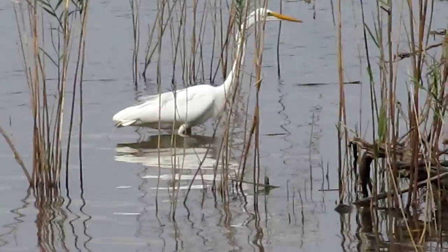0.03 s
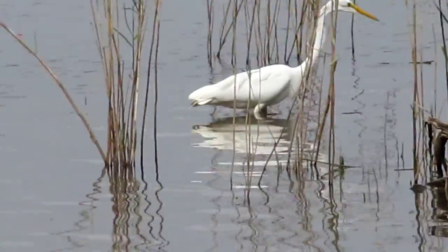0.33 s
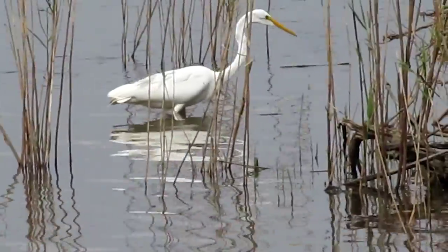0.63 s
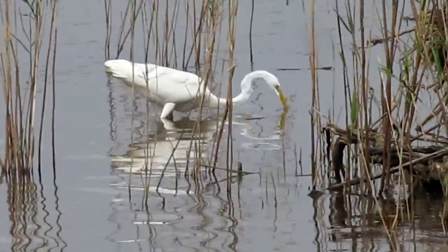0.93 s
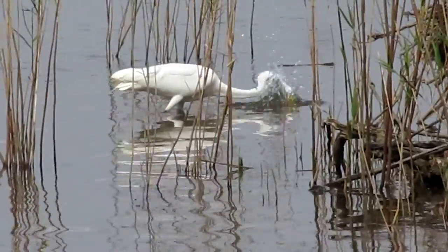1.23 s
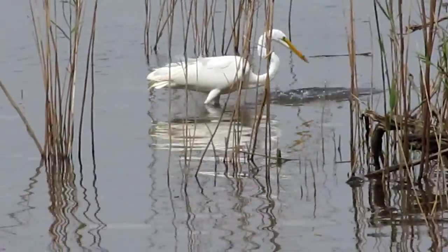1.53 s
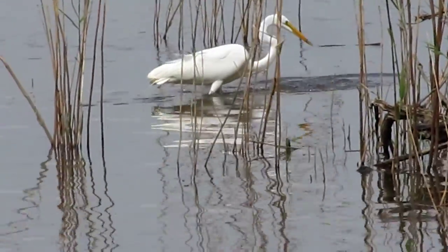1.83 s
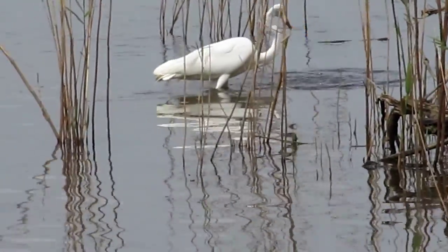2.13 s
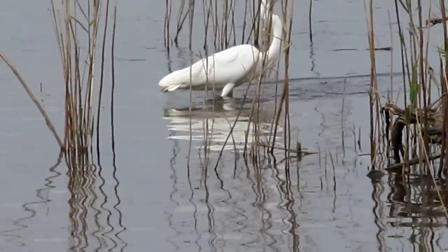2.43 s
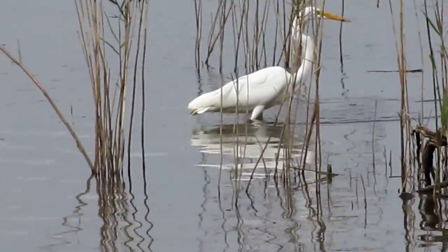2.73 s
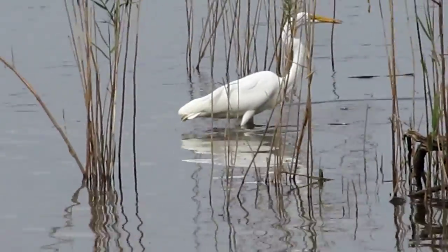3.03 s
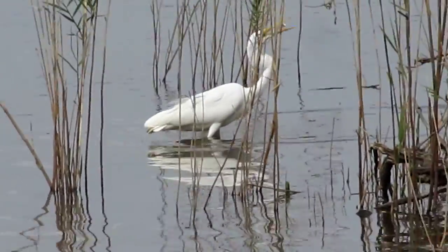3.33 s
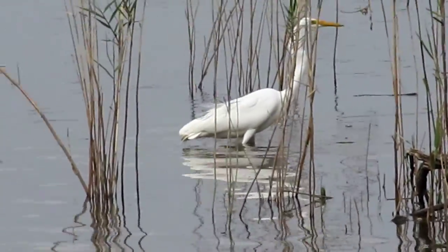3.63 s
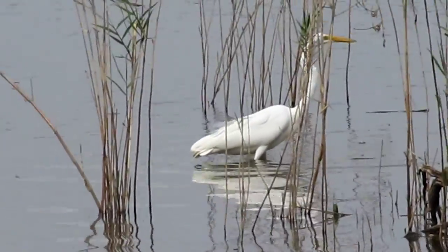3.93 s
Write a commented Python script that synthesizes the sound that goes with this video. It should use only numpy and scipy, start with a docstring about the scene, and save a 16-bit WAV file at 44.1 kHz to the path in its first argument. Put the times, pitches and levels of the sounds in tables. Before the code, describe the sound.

A distant engine drones over far traffic and softly hissing reeds at a lakeside. A wading bird makes a few very faint splashes and drips, then wind buffets the microphone's right side and faint hoots follow.

```python
"""A reedy lakeside, on a stereo microphone in light wind. From the start a distant engine drones, its low
partials swelling and fading, over a steadier engine, far traffic and the hiss of reeds. Between 0.5 and
2 s a wading bird strikes the shallows straight ahead: very faint splashes, drips and bubbles. The drone
sinks slightly, and from 2 s a gust buffets the right port. Near 3 s faint hoots begin, and the traffic
brightens for a moment."""
import sys
import numpy as np
from scipy import signal
from scipy.fft import rfft, irfft, next_fast_len
from scipy.io import wavfile
from scipy.ndimage import uniform_filter1d, map_coordinates

SR = 44100
rng = np.random.default_rng(int(sys.argv[2]) if len(sys.argv) > 2 else 0)


def pcm_store(signal):
    """Save signal as 16-bit PCM."""
    levels = np.round(np.clip(np.atleast_2d(signal), -1, 1) * 32767)
    wavfile.write(sys.argv[1], SR, levels.astype(np.int16).T)


N = 176400


def amp(db):
    """Decibels to gain."""
    return 10 ** (np.asarray(db) / 20)


def unit(x):
    """Scale to rms 1."""
    return x / np.sqrt(np.mean(x ** 2) + 1e-20)


def along(points, hz):
    """Read (frequency [Hz], value) points on a log axis."""
    freqs, values = np.transpose(points)
    return np.interp(np.log(hz + 1), np.log(freqs + 1), values)


def curve(rows):
    """Join (time [s], value) points, one value per sample."""
    return np.interp(np.arange(N) / SR, *np.transpose(rows))


def wobble(rate):
    """A smooth random curve, rate knots a second."""
    return map_coordinates(rng.standard_normal(512), [np.arange(N) * rate / SR], mode="wrap")


def swell(middle_s, width_s):
    """A bell-shaped rise and fall."""
    return np.exp(-((np.arange(N) / SR - middle_s) / width_s) ** 2)


def burst(x, shape):
    """A piece of x under an envelope, of rms 1 at its top."""
    return x * shape / np.sqrt(np.sum((x * shape) ** 2) / np.sum(shape ** 2))


def filtered(x, response):
    """Filter x by a gain given as a function of frequency."""
    size = next_fast_len(N + SR // 2)
    return irfft(rfft(x, size) * response(np.fft.rfftfreq(size, 1 / SR)), size)[..., :N]


def rush(spectrum, coherence, patchy_db):
    """Stereo noise of rms 1, its gain varying in random patches of time and frequency."""
    cells = signal.stft(rng.standard_normal((2, N)), nperseg=1024)[2]
    patches = uniform_filter1d(rng.standard_normal(cells.shape[1:]), size=8, axis=0)
    patches = uniform_filter1d(patches, size=10, axis=1)
    pair = signal.istft(cells * amp(patchy_db * unit(patches)), nperseg=1024)[1][:, :N]

    def mid_side_gains(hz):
        spread = np.arccos(np.clip(along(coherence, hz), -1, 1)) / 2
        return amp(along(spectrum, hz)) * [np.cos(spread), np.sin(spread)]

    mid, side = filtered(pair, mid_side_gains)
    return unit(np.array([mid + side, mid - side]))


def partial(hz, fade_db, drift_rad, rate):
    """A tone of rms 1 whose level and phase waver on the way through the air."""
    phase = 2 * np.pi * (np.cumsum(hz * np.ones(N)) / SR + rng.random())
    return unit(amp(fade_db * wobble(rate)) * np.sin(phase + drift_rad * wobble(rate)))


def spray(centre_hz, octaves, grainy_db):
    """Half a second of grainy noise around one pitch, of rms 1."""
    n = SR // 2
    noise = rng.standard_normal(n)
    grains = amp(grainy_db * rng.standard_normal(n // 32 + 1).repeat(32)[:n])
    offset = np.log2((np.fft.rfftfreq(n, 1 / SR) + 1) / centre_hz) / octaves
    return unit(irfft(rfft(noise * grains) * np.exp(-offset ** 2 / 2), n))


def traffic():
    """Far traffic: an even wash that brightens for a moment."""
    # loudness of the wash (time [s], level [dB])
    level = [(0, -40), (.8, -40), (1.6, -40), (2.4, -40), (3, -40.5), (3.45, -39.5), (4, -40.5)]
    # spectra of the wash and of its brightening (frequency [Hz], relative density [dB])
    spectrum = [(20, -22), (45, -5.5), (90, 2), (150, -2.5), (260, -2.5), (400, -6), (800, -7.5),
                (1100, -10.5), (1600, -15.5), (2300, -23.5), (3500, -35), (9000, -62)]
    bright_spectrum = [(400, -19), (700, 0), (950, 10), (1300, -19), (2200, -32)]
    # likeness of left and right (frequency [Hz], coherence [0-1])
    coherence = [(60, 1), (250, 0.97), (450, 0.89), (740, 0.84), (1200, 0.48), (2000, 0.59), (3000, 0.086)]
    wash = amp(curve(level)) * rush(spectrum, coherence, patchy_db=0.5)
    bright_gain = amp(-48.5) * swell(middle_s=3.33, width_s=0.27)
    return wash + bright_gain * rush(bright_spectrum, coherence, patchy_db=1.0)


def reeds():
    """The thin, high hiss of air and reeds, spread wide along the shore."""
    # loudness of the hiss (time [s], level [dB])
    level = [(0, -56.5), (1.1, -56.5), (2, -56.5), (2.7, -56), (3.3, -58), (4, -56.5)]
    # its spectrum (frequency [Hz], relative density [dB])
    spectrum = [(800, -25), (1800, 0.5), (2600, 4.5), (3600, 3), (5200, 1.2), (7500, -2), (10000, -6),
                (13000, -11), (15000, -13.5), (15700, -25)]
    # likeness of left and right (frequency [Hz], coherence [0-1])
    coherence = [(2000, 0.15), (5000, 0.22), (8000, 0.27), (12000, 0.14)]
    level_db = curve(level) + 0.25 * wobble(21.27)
    return amp(level_db) * rush(spectrum, coherence, patchy_db=1.17)


def background():
    """Traffic and reeds at the microphone: the lows lean left, the rest slightly right."""
    # balance (frequency [Hz], left minus right [dB])
    tilt = [(100, 2.5), (380, 0.5), (700, -.5), (1300, -1.8), (2400, -2.5), (4400, -1), (12000, -.7)]
    sides = np.array([[0.5], [-0.5]])
    return filtered(traffic() + reeds(), lambda hz: amp(along(tilt, hz) * sides))


def hoots():
    """Short, nearly pure notes, perhaps a far water bird, barely above the traffic."""
    # hoots (time [s], width [s], pitch [Hz], level [dB])
    notes = [(2.945, .05, 547, -43.5), (2.925, .035, 500, -48), (3.47, .035, 657, -46.5),
             (3.98, .035, 560, -45)]
    return sum(amp(db) * swell(s, width) * partial(hz, fade_db=0.5, drift_rad=0.4, rate=48)
               for s, width, hz, db in notes)


def hum():
    """The steadier engine, far off: harmonics of one fixed low pitch."""
    # loudness of the engine (time [s], level [dB])
    level = [(0, -51), (1.3, -48), (2, -50), (2.2, -43), (3, -44.5), (4, -46)]
    # its harmonics (multiple, relative level [dB])
    harmonics = [(1, -1.5), (2, -2.5), (3, -3), (4, -9)]
    pitch_hz = 55.23
    engine = sum(amp(db) * partial(round(k) * pitch_hz, fade_db=3, drift_rad=0.23, rate=6.1)
                 for k, db in harmonics)
    return amp(curve(level)) * engine


def machinery():
    """Other far machinery: one low, throbbing tone gives way to another."""
    # throbs (start [s], end [s], pitch [Hz], level [dB])
    throbs = [(-.4, 2.5, 43.68, -41.5), (2.4, 4.4, 119.6, -49)]
    fade_s = 0.34
    out, t = np.zeros(N), np.arange(N) / SR
    for start, end, hz, db in throbs:
        gate = np.clip(np.minimum(t - start, end - t) / fade_s, 0, 1)
        out += amp(db) * gate * partial(hz, fade_db=5.5, drift_rad=0.19, rate=4.9)
    return out


def wading_bird():
    """A bird strikes the shallows: soft splashes, drips, and air bubbles as it lifts its head."""
    # splashes (time [s], time to fall 20 dB [s], level [dB], centre [Hz])
    splashes = [(.515, .05, -68, 10000), (1.053, .1, -57.5, 2400), (1.078, .04, -59, 10000),
                (1.152, 0.11, -54, 2600), (1.157, .08, -54.5, 5000), (1.355, .05, -56, 2800),
                (1.375, .07, -67, 9500), (1.535, .06, -59, 4200), (1.572, .07, -51.5, 2680),
                (1.626, .03, -53, 3000), (1.913, 0.21, -59, 4600), (1.928, .16, -62, 11000)]
    # drips (time [s], level before halving [dB], centre [Hz])
    drips = [(1.091, -56, 6000), (1.143, -58, 12000), (1.207, -59, 9200), (1.455, -61, 8000),
             (1.543, -53, 5740), (1.602, -55, 5040), (1.683, -55, 4160), (1.782, -62, 9000),
             (1.837, -53, 6100), (2.03, -59, 13800)]
    # bubbles (time [s], level [dB], starting pitch [Hz])
    bubbles = [(1.587, -50, 2500), (1.632, -48, 2280), (2.002, -51, 2090)]
    splash_rise_s, drip_t60_s = 0.008, 0.095
    bubble_rise_s, bubble_t60_s, climb_per_s = 0.0019, 0.043, 10
    out, t = np.zeros(N + SR), np.arange(SR // 2) / SR
    for s, decay, db, hz in splashes:
        envelope = (1 - np.exp(-t / splash_rise_s)) * amp(db - 20 * t / decay)
        out[round(s * SR):][:len(t)] += envelope * spray(hz, octaves=0.5, grainy_db=5)
    for s, db, hz in drips:
        envelope = amp(db - 60 * t / drip_t60_s) / 2
        out[round(s * SR):][:len(t)] += envelope * spray(hz, octaves=0.22, grainy_db=1)
    for s, db, hz in bubbles:
        envelope = (1 - np.exp(-t / bubble_rise_s)) * amp(db - 60 * t / bubble_t60_s)
        rising_tone = np.sin(2 * np.pi * hz * t * (1 + climb_per_s * t / 2))
        out[round(s * SR):][:len(t)] += envelope * rising_tone
    return out[:N]


def wind():
    """Lumpy buffeting, unrelated at the microphone's two ports; the left one is sheltered."""
    # wind on the exposed right port (time [s], level [dB])
    gust = [(0, -39), (.45, -40.5), (.74, -35.5), (1.07, -38.5), (1.35, -36.5), (1.65, -43), (1.88, -52.5),
            (2.02, -30.5), (2.26, -36), (2.55, -31.5), (2.9, -32), (3.12, -38.5), (3.35, -41), (3.8, -48),
            (4, -50)]
    # its spectrum (frequency [Hz], relative density [dB])
    spectrum = [(6, -3), (22, -0.5), (38, -5.5), (65, -2), (100, -13.5), (150, -23), (250, -30.5),
                (500, -64), (1000, -90)]
    exposed_db = curve(gust)
    sheltered_db = -41.5 + 0.24 * (exposed_db - exposed_db.mean())
    lumps = amp(0.9 * np.array([wobble(27), wobble(17)]))
    rumble = filtered(rng.standard_normal((2, N)), lambda hz: amp(along(spectrum, hz)))
    return amp([sheltered_db, exposed_db]) * unit(lumps * rumble)


def eddies():
    """Single eddies thump the exposed right port."""
    # thumps (time [s], width [s], level [dB])
    thumps = [(.745, 0.034, -29), (2.215, 0.016, -24), (2.265, .028, -22), (2.37, 0.027, -29.5),
              (2.54, 0.053, -30.5), (2.88, 0.034, -29), (3.11, 0.03, -27)]
    # their spectrum (frequency [Hz], relative density [dB])
    spectrum = [(8, -18), (28, 8), (45, 10.5), (70, -1), (100, -18), (180, -18.5), (300, -33), (1000, -90)]
    churn = filtered(rng.standard_normal(N), lambda hz: amp(along(spectrum, hz)))
    right = sum(amp(db) * burst(churn, swell(s, width)) for s, width, db in thumps)
    return np.array([np.zeros(N), right])


def drone():
    """The distant engine: harmonics of one slowly sinking pitch, each fading on its own."""
    # the fundamental (time [s], pitch [Hz])
    pitch = [(0, 132), (1.1, 132.1), (2.4, 130.7), (3.1, 130.7), (4, 130.1)]
    # loudness of the first three harmonics (time [s], level [dB])
    first_level = [(0, -50.5), (.42, -51), (.58, -41), (1.1, -38.5), (1.78, -45), (1.91, -51.5),
                   (2.25, -44.5), (2.52, -36.5), (2.82, -47.5), (2.98, -36.5), (3.43, -44), (3.72, -35),
                   (4, -40.5)]
    second_level = [(0, -45), (.08, -41), (.18, -54.5), (.37, -38), (.53, -52.5), (.6, -42.5), (.87, -43),
                    (.98, -53.5), (1.55, -52), (1.66, -44.5), (1.85, -46.5), (2.18, -55), (2.44, -42.5),
                    (2.61, -51), (2.74, -43.5), (2.88, -38.5), (3.06, -45), (3.16, -54), (3.24, -38.5),
                    (3.52, -52), (3.6, -40.5), (4, -54.5)]
    third_level = [(0, -65), (.8, -58.5), (1.5, -61.5), (2.1, -55), (2.65, -68), (2.85, -53), (3.12, -58),
                   (3.3, -50), (3.45, -59), (3.6, -51), (3.75, -60.5), (4, -48.5)]
    # weaker harmonics (multiple, level [dB])
    overtones = [(4, -57.5), (5, -62)]
    hz = curve(pitch)
    first = amp(curve(first_level)) * partial(hz, fade_db=1.6, drift_rad=0.16, rate=8.8)
    second = amp(curve(second_level)) * partial(2 * hz, fade_db=1.23, drift_rad=0.42, rate=10)
    third = amp(curve(third_level)) * partial(3 * hz, fade_db=3.5, drift_rad=0.68, rate=10)
    upper = sum(amp(db) * partial(round(k) * hz, fade_db=3.5, drift_rad=1.0, rate=7.11)
                for k, db in overtones)
    return first + second + third + upper


def scene():
    """Far sounds arrive a little from the right, the bird from ahead; wind acts on the ports."""
    far = background() + drone() + hum() + machinery() + hoots()
    left_lag_s = 0.000068
    far = filtered(far, lambda hz: np.exp(1j * np.pi * hz * left_lag_s * np.array([[-1], [1]])))
    return far + wading_bird() + wind() + eddies()


def record(dry):
    """The recorder keeps nothing above its band limit."""
    top_hz = 15700
    return filtered(dry, lambda hz: hz < top_hz)


dry = scene()
out = record(dry)
pcm_store(out)
```